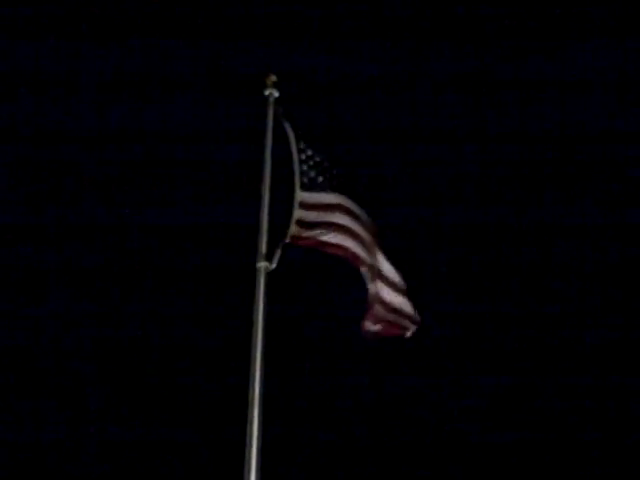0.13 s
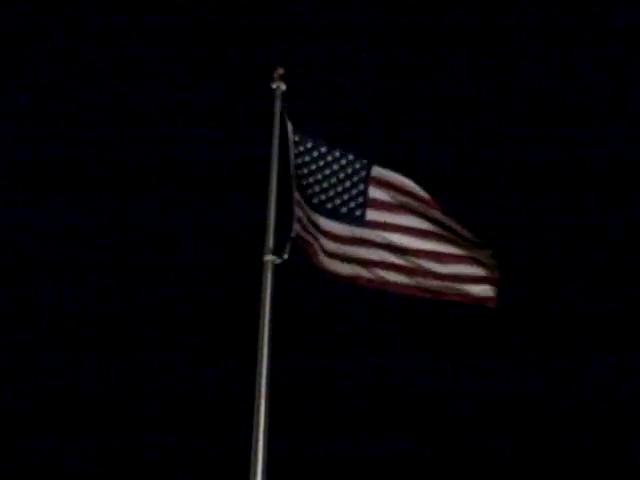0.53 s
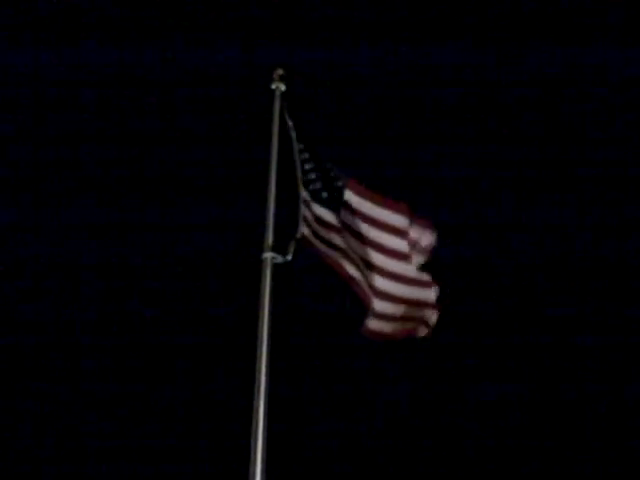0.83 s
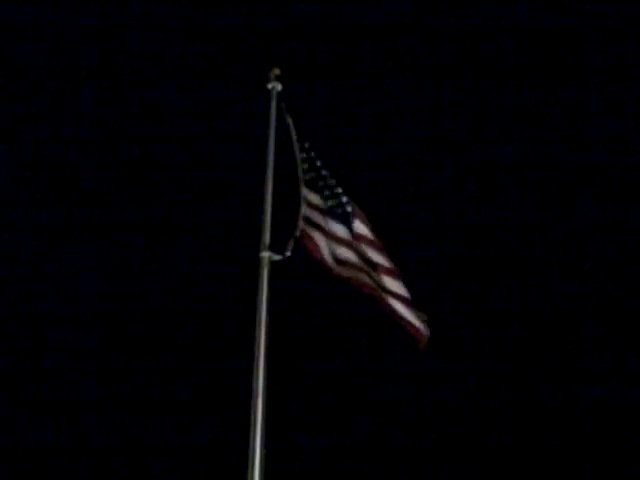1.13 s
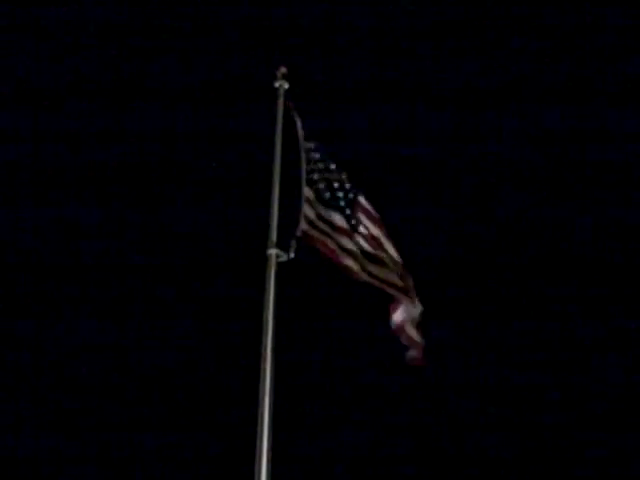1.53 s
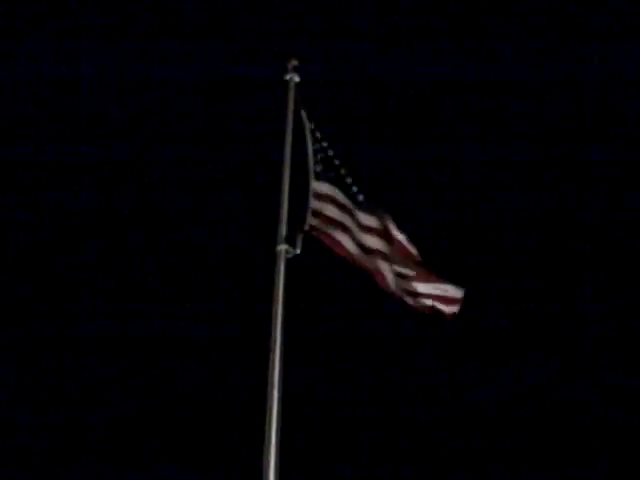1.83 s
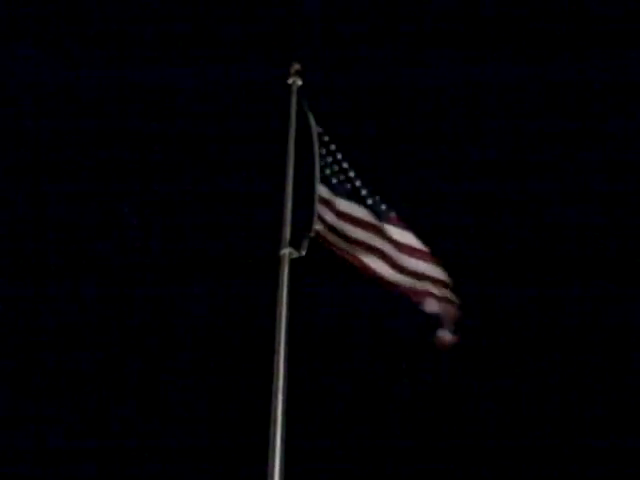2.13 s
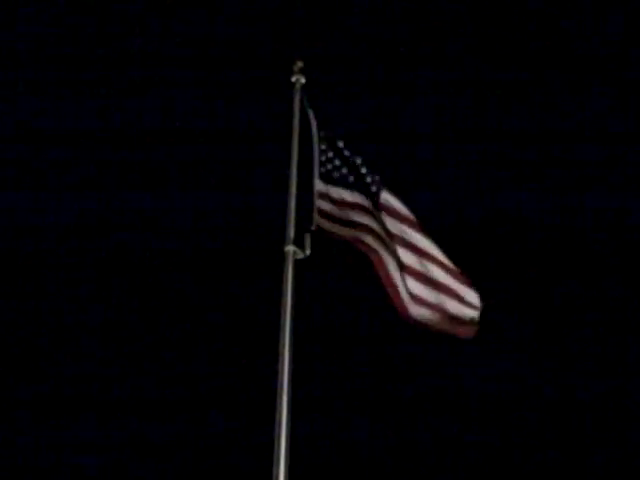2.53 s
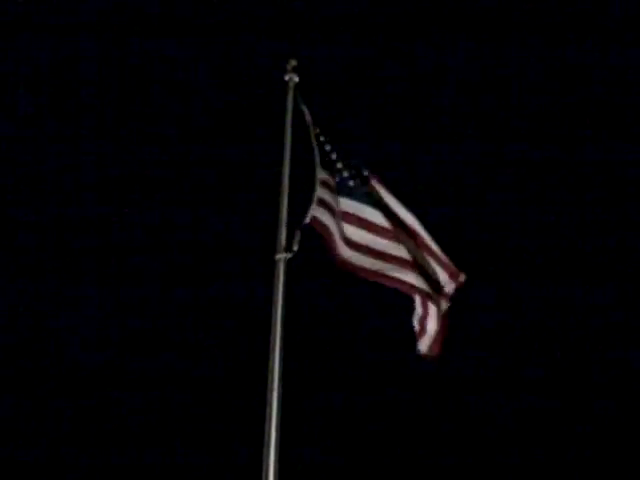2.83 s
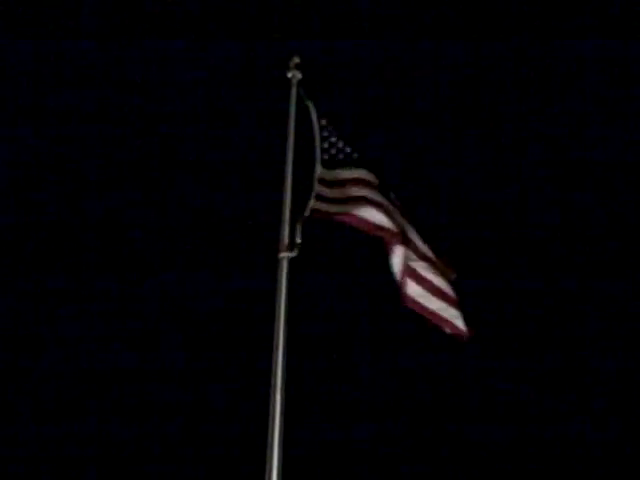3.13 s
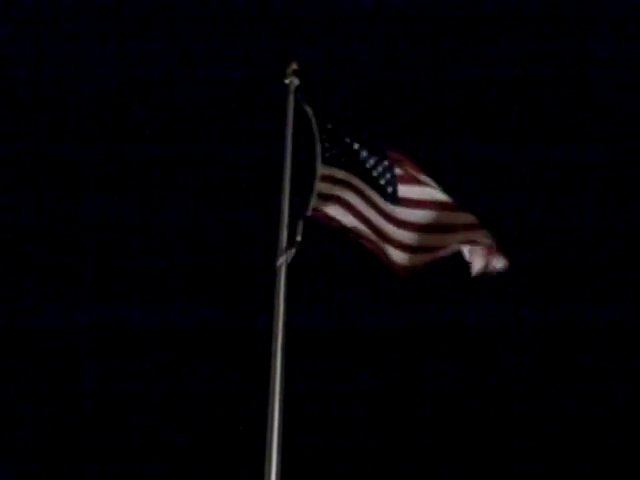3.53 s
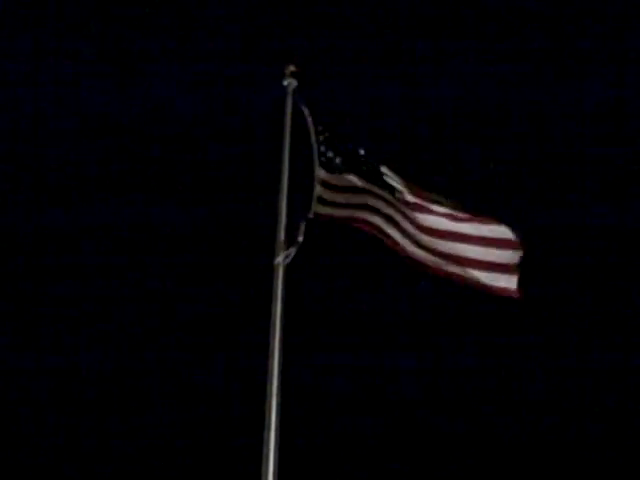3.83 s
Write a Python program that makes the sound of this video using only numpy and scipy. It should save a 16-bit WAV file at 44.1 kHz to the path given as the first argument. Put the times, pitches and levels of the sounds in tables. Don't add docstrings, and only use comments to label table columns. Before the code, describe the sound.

Strong wind gusts thump and distort on an unshielded microphone, lulling, then hitting hard again

```python
import sys
import numpy as np
from scipy import signal
from scipy.fft import rfft, irfft
from scipy.io import wavfile
from scipy.ndimage import uniform_filter1d, map_coordinates

SR = 44100
rng = np.random.default_rng(int(sys.argv[2]) if len(sys.argv) > 2 else 0)


def how_loud(loudness_db):
    steps = np.asarray(loudness_db, float) / 20
    return 10 ** steps


def inscribe(sig):
    pcm = np.round(np.clip(np.atleast_2d(sig).T, -1, 1) * 32767)
    wavfile.write(sys.argv[1], SR, pcm.astype(np.int16))


N = 176400


def read_spectrum(points, hz):
    point_hz, level_db = np.transpose(points)
    return np.interp(np.log(hz + 1), np.log(point_hz + 1), level_db)


def curve(points, column=1):
    points = np.array(points)
    return np.interp(np.arange(N) / SR, points[:, 0], points[:, column])


def evened(x):
    return x / np.sqrt(np.mean(x ** 2) + 1e-20)


def coloured(points, size=N):
    gain = how_loud(read_spectrum(points, np.fft.rfftfreq(size, 1 / SR)))
    return evened(irfft(rfft(rng.standard_normal(size)) * gain, size))


def wander(seconds):
    walk = np.cumsum(rng.standard_normal(N))
    width = seconds * SR
    at = np.arange(N)
    step = np.interp(at + width, at, walk) - walk
    return evened(signal.lfilter([1], [1, -np.exp(-2 / width)], step))


# pitch_hz, level_db [dB per Hz]
EDDY_SPECTRUM = [(20, -2.5), (80, -2), (150, 2.5), (260, -0.5), (420, -10.5), (700, -29.5), (1200, -45.5),
                 (3000, -88)]


def eddy_field(size):
    kinks_per_s, kink_db, kink_s = 45, -4, 0.0011
    steadiness = 0.96
    smooth = coloured(EDDY_SPECTRUM, size=size)
    power = uniform_filter1d(uniform_filter1d(smooth ** 2, size=400), size=400)
    smooth /= power ** (steadiness / 2)
    t = np.hypot(np.arange(-400, 400) / SR, .00035)
    cusp = np.exp(-abs(t) / kink_s) - 0.4 * np.exp(-abs(t) / (2.8 * kink_s))
    kinks = (rng.random(size) < kinks_per_s / SR) * rng.laplace(0, 1, size)
    return evened(smooth) + how_loud(kink_db) * 2 * signal.oaconvolve(kinks, cusp, "same")


# start_s, length_s, level_db, air_speed [re breeze]
GUSTS = [(-.02, 0.072, -26, 1), (.085, 0.053, -14, 1.375), (.12, 0.057, -10, 1.73),
         (.17, 0.051, -14, 1.55), (.455, 0.071, -19.5, 1.28), (.53, 0.05, -16, 1.34),
         (.75, 0.075, -16.5, 1.25), (.986, 0.079, -14.5, 1.05), (1.165, 0.054, -16, 1.03),
         (1.245, 0.071, -16, 1.27), (1.365, 0.034, -9, 1), (1.385, 0.071, -8.5, 1.45),
         (1.52, 0.049, -12, 1.01), (1.585, 0.057, -9, 1.3), (1.62, 0.052, -12, 1.73),
         (1.665, 0.073, -13, 1.24), (3.01, 0.045, -12.5, 1.03), (3.046, 0.036, -13.5, 1.1),
         (3.075, 0.045, -19.5, 0.98), (3.155, 0.036, -9, 1.35), (3.241, 0.023, -15, 2.18),
         (3.262, .03, -18, 1.1), (3.308, 0.038, -13.5, 1.55), (3.347, 0.0303, -10.5, 1.2),
         (3.37, 0.022, -17.5, 1.1),
         (.03, 0.07, -19, 1.06), (0.227, 0.04, -21, 1.36), (0.323, 0.1, -26, 0.96),
         (0.506, 0.028, -20.5, 1.24), (0.584, 0.095, -23.5, 1.1), (0.683, 0.0717, -21.5, 1.4),
         (.87, 0.067, -23.5, 0.97), (1.081, 0.05, -24.5, 0.9), (1.13, 0.03, -17, 0.96),
         (1.791, 0.1, -18.5, 0.86), (1.92, 0.049, -19.5, 0.88), (1.969, 0.037, -22, 1.11),
         (2.068, 0.09, -30, 1.15), (2.16, 0.049, -22.5, 0.98), (2.26, 0.05, -18.5, 0.74),
         (2.331, 0.047, -26.5, 0.72), (2.435, 0.031, -25.5, 0.53), (2.56, 0.073, -29, 0.8),
         (2.698, 0.06, -21.5, 1.33), (3.123, 0.026, -23, 1.282), (3.418, 0.06, -25, .9),
         (3.522, 0.067, -29.5, 0.79), (3.66, 0.031, -23.5, 1.15), (3.75, 0.064, -20.5, 1.26),
         (3.88, 0.069, -24, 1.2)]
# time_s, rumble_db, small_eddy_db, air_speed [re breeze]
BREEZE = [(0, -48, -23, 0.88), (.3, -20.5, -24, 0.97), (.66, -24.5, -21, 1), (.84, -34, -23.5, 0.85),
          (.96, -25, -27, 0.61), (1.1, -32, -22, 0.81), (1.33, -21, -26.5, 0.82), (1.49, -40, -21.5, 0.76),
          (1.76, -38, -24, 0.85), (2.03, -24, -37.5, 0.87), (2.24, -33, -63, 0.55),
          (2.3, -17.5, -34.5, 0.76), (2.52, -34, -42, 0.74), (2.78, -19.5, -39, 0.87),
          (2.93, -36, -36.5, 0.72), (3.22, -20, -23, 0.86), (3.6, -17, -32.5, 1.2), (4, -20.5, -56, 0.84)]
# pitch_hz, level_db [dB per Hz]
RUMBLE_SPECTRUM = [(12, -26), (22, 2), (36, -2), (60, -1), (110, -4.5), (180, -19.5), (300, -24.5),
                   (600, -76)]
# pitch_hz, level_db [dB per Hz]
FIZZ_SPECTRUM = [(350, -31), (750, 3), (1500, -8), (3500, -43.5)]


def wind():
    lump_db, lump_s = 3.5, 0.0073
    rise, fall, speed_arch = 0.309, 0.46, 0.2454
    fizz_db, fizz_db_per_speed, fizz_lump_db = -32, 22, 12
    rumble_lump_db, rumble_with_gust_db = 4, -33
    field = eddy_field(size=4 * N)
    swirl = np.exp(0.12 * wander(0.01244))
    lumps = evened(how_loud(lump_db * wander(lump_s)))
    fizz = coloured(FIZZ_SPECTRUM) * evened(how_loud(fizz_lump_db * wander(0.0036)))

    def sweep(place):
        return map_coordinates(field, [place], order=3, mode="wrap")

    power = how_loud(curve(BREEZE, column=2)) ** 2
    breeze_place = np.cumsum(swirl * curve(BREEZE, column=3))
    eddies = np.sqrt(power) * lumps * sweep(breeze_place)
    for k, (start_s, length_s, level_db, speed) in enumerate(GUSTS):
        first = max(int(start_s * SR), 0)
        last = min(int((start_s + 1.15 * length_s) * SR), N)
        at = np.arange(first, last)
        u = (at / SR - start_s) / length_s
        shape = np.sin(np.pi / 2 * np.clip(np.minimum(u / rise, (1.15 - u) / fall), 0, 1))
        air = speed * swirl[at] * (1 - speed_arch * (1 - shape))
        place = N + k * N // 16 + np.cumsum(air)
        eddies[at] += how_loud(level_db) * evened(shape * lumps[at] * sweep(place))
        gust_fizz_db = level_db + fizz_db + fizz_db_per_speed * (speed - 1)
        eddies[at] += how_loud(gust_fizz_db) * shape ** 2 * fizz[at]
        power[at] += (how_loud(level_db) * shape) ** 2
    rumble = coloured(RUMBLE_SPECTRUM) * evened(how_loud(rumble_lump_db * wander(0.015)))
    rumble_level = np.sqrt(how_loud(curve(BREEZE)) ** 2 + power * how_loud(rumble_with_gust_db) ** 2)
    return eddies + rumble * rumble_level


# time_s, peak_db, swirl_hz, turns [count]
SLAPS = [(.001, -3.5, 187, 1.6), (0.117, -6.5, 517, 1.13), (.138, 4.5, 265, 0.68), (0.1436, 5, 295, 0.78),
         (.156, -6, 700, 0.94), (.163, 1, 404, 1.1), (0.2007, 3, 298, 0.94), (.205, -4.5, 810, 0.88),
         (.36, -13, 350, 0.78), (.387, -14, 383, 1), (0.526, -5.5, 310, 0.89), (0.553, -1, 327, 1.2),
         (0.762, -7.5, 402, 0.88), (0.994, 0.5, 293.3, 0.84), (1.405, 5, 234, 0.65),
         (1.425, 6.5, 128, 0.99), (1.603, 2.5, 324, 0.89), (1.609, 1, 210, 3.15), (1.656, -6, 594, 0.65),
         (1.658, -14.5, 1700, 0.99), (1.419, -13, 1300, 1.7), (1.144, -8.5, 300, 0.49),
         (1.259, -4, 266, 1.5), (1.278, -2.5, 282.7, 1.8), (1.294, -11, 460, 2.4), (1.397, 3.5, 333, 1.1),
         (1.439, 0, 300, 1.2), (1.635, -5, 353, 2.1), (1.679, -6.5, 450, 0.96), (1.523, 1.5, 211, 2.3),
         (1.55, -3, 253, 1), (1.7, -1, 294, 1.24), (1.894, -5, 170, 0.79), (1.932, -3, 315, 1.24),
         (1.98, -2.5, 358, 1.16), (3.071, 2.5, 268, 2.6), (3.174, 2.5, 406, 1.63), (3.188, 1, 575, 0.99),
         (3.252, -4, 490, 2.3), (3.03, -4, 230.7, 1), (2.712, -12.5, 496, 2.5), (3.138, -16, 596, 1.2),
         (3.275, -7, 420, .7), (3.287, -19, 500, 0.84), (3.314, -5.5, 424, 2.1), (3.332, 2.5, 497, 0.81),
         (3.346, 4.5, 470, 2.2), (3.561, -20.5, 538.7, 0.55), (3.789, -13.5, 406, 0.76),
         (3.408, 0.5, 430, 1.93), (3.618, -15, 255, 0.44), (3.776, -12.5, 406, 0.78)]


def slaps():
    t, out, cover = np.arange(N) / SR, np.zeros(N), np.zeros(N)
    for time_s, peak_db, swirl_hz, turns in SLAPS:
        u = (t - time_s) * swirl_hz
        bell = np.exp(-(u / (0.35 * turns)) ** 2)
        out += how_loud(peak_db) * bell * np.cos(2 * np.pi * (u + 0.16 + 0.046 * u ** 2))
        cover = np.maximum(cover, np.sqrt(bell))
    return out, cover


# time_s, peak_db
CRACKS = [(0.1415, -13), (0.1944, -23.5), (0.2028, -19.5), (0.762, -36), (1.145, -27), (1.395, -25),
          (1.4054, -15.5), (1.4216, -15), (1.4274, -14), (1.5489, -22), (1.5998, -25), (1.6109, -14),
          (1.678, -26), (3.0686, -12.5), (3.175, -17), (3.251, -22), (3.2761, -33), (3.331, -19),
          (3.3461, -13), (3.3604, -28), (3.406, -37), (3.7763, -32)]


def cracks():
    edge_s, decay_s, lag_s = .00009, 0.00027, 0.000985
    gain_db, blunting = 1.5, 0.35
    out, t = np.zeros(N), np.arange(-200, 200) / SR
    for time_s, peak_db in CRACKS:
        edge = edge_s * how_loud(-blunting * (peak_db + 13.5))
        step = np.tanh(t / edge) * np.exp(-abs(t) / decay_s)
        first = round((time_s + lag_s) * SR) - len(t) // 2
        out[first:][:len(t)] += how_loud(peak_db + gain_db) * step
    return out


# time_s, peak_db, pitch [re pole]
TAPS = [
    (3.613, -46, 0.98),
    (3.619, -47.5, 0.93),
    (3.629, -52, 1.1),
    (3.642, -55, 1.2),
]
# pitch_hz, level_db, t60_s
POLE_MODES = [(2780, 7, 0.068), (3500, -5, 0.069), (4020, 2, 0.17), (4920, 11, 0.035), (6340, 5, 0.088),
              (8500, -30, 0.033)]


def halyard():
    t, out = np.arange(N) / SR, np.zeros(N)
    rattle = evened(np.convolve(rng.standard_normal(N), np.hanning(120), "same"))
    for time_s, peak_db, pitch in TAPS:
        age = np.maximum(t - time_s, 0)
        rise = np.minimum(age / 0.0018, 1)
        for (mode_hz, mode_db, t60_s), jitter in zip(POLE_MODES, rng.uniform(-0.36, 1, len(POLE_MODES))):
            ring_hz = mode_hz * pitch * (1 + 0.03 * jitter)
            decay = how_loud(peak_db + mode_db + 2.8 * jitter - 60 * age / t60_s)
            out += decay * rise * np.sin(2 * np.pi * (ring_hz * age + 7 * jitter))
    return out * rattle


# time_s, peak_db, centre_hz
TICKS = [
    (2.223, -42.5, 8500),
    (3.741, -43, 7420),
    (3.83, -38, 4000),
    (3.949, -37, 6080),
    (3.99, -45, 7300),
]


def twigs():
    decay_s, width = 0.003, 0.24
    out, t = np.zeros(N), np.arange(1024) / SR
    hz = np.fft.rfftfreq(1024, 1 / SR)
    envelope = np.minimum(t / .001, 1) * np.exp(-t / decay_s)
    for (time_s, peak_db, centre_hz), noise in zip(TICKS, rng.standard_normal((len(TICKS), 1024))):
        band = np.exp(-(np.log((hz + 1) / centre_hz) / width) ** 2)
        tick = how_loud(peak_db) * evened(irfft(rfft(noise) * band)) * envelope
        part = out[round(time_s * SR):][:1024]
        part += tick[:len(part)]
    return out


# time_s, level_db
LEAF_SWELL = [(0.0, -45.5), (0.19, -47.5), (0.47, -47.5), (0.79, -45.5), (0.99, -44.5), (1.24, -44.5),
              (1.67, -49.5), (2.12, -48.5), (2.6, -45), (2.87, -45.5), (3.4, -48), (3.66, -47.5),
              (4.0, -45.5)]
# pitch_hz, level_db [dB per Hz]
LEAF_SPECTRUM = [(200, 8), (1100, 4.5), (1900, -2.5), (5000, -3), (7000, -4.5), (9500, -15), (11500, -27.5),
                 (17000, -34)]


def leaves():
    hiss_db, patch_db = 5.5, 0.9
    _, _, z = signal.stft(coloured(LEAF_SPECTRUM), SR, nperseg=512)
    patches = uniform_filter1d(rng.standard_normal(z.shape), size=8, axis=0)
    patches = evened(uniform_filter1d(patches, size=10, axis=1))
    hiss = signal.istft(z * how_loud(patch_db * patches), SR, nperseg=512)[1][:N]
    return evened(hiss) * how_loud(curve(LEAF_SWELL) + hiss_db)


def scene():
    blows, cover = slaps()
    sheltered_wind = wind() * (1 - 0.85 * cover)
    return (sheltered_wind + blows + cracks() + halyard() + twigs() + leaves())[None]


def band_limit(x):
    return signal.sosfilt(signal.butter(12, 20000, fs=SR, output="sos"), x)


def record(dry):
    ceiling, grit_db, floor_db, edge_hz = 1.02, -35, -78, 17400
    clipped = np.clip(dry, -ceiling, ceiling)
    slope = 10 * np.gradient(uniform_filter1d(clipped, size=24, axis=1), axis=1)
    noise_level = how_loud(grit_db) * abs(slope) ** 1.25 + how_loud(floor_db)
    gritty = clipped + noise_level * rng.standard_normal(dry.shape)
    padded = np.pad(gritty, ((0, 0), (127, 127)), "edge")
    lowpass = signal.firwin(255, edge_hz, window=("kaiser", 9), fs=SR)
    limited = signal.oaconvolve(padded, lowpass[None], "valid")
    return band_limit(limited)


dry = scene()
out = record(dry)
inscribe(out)
```